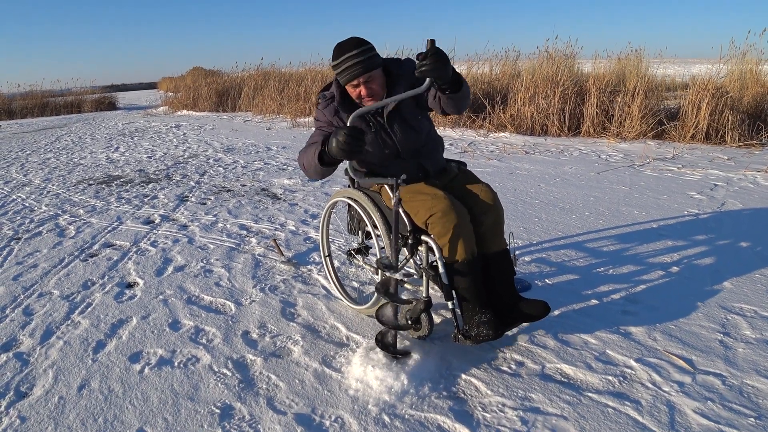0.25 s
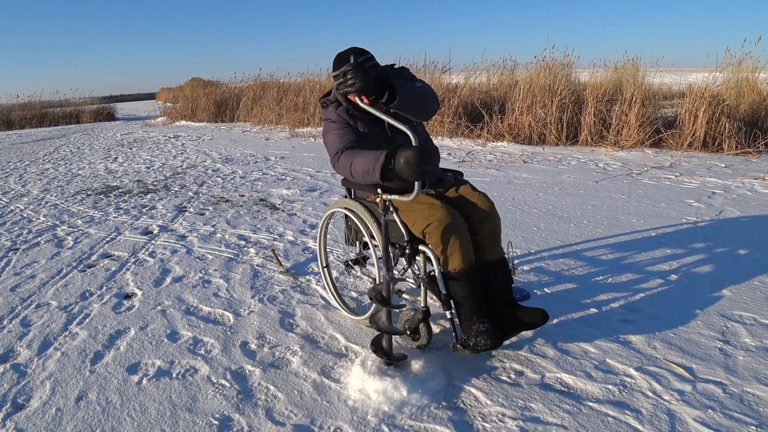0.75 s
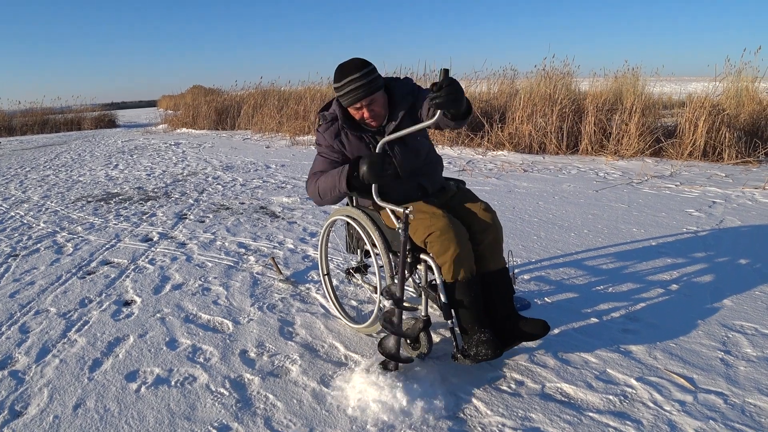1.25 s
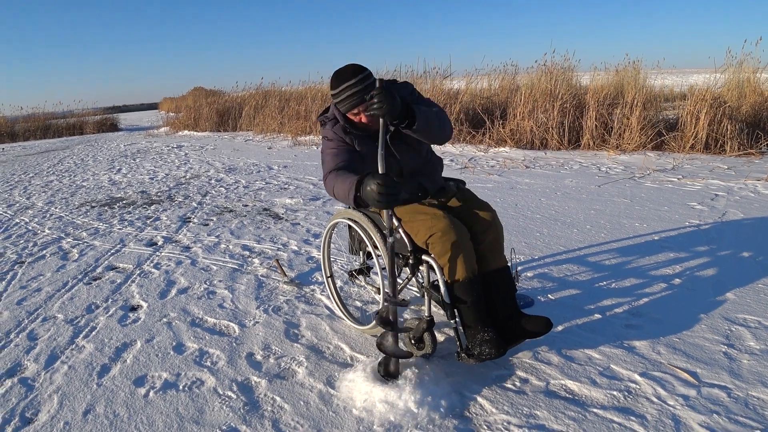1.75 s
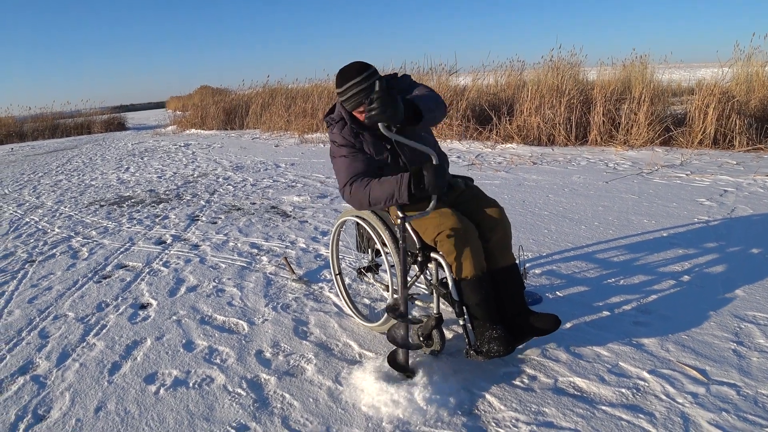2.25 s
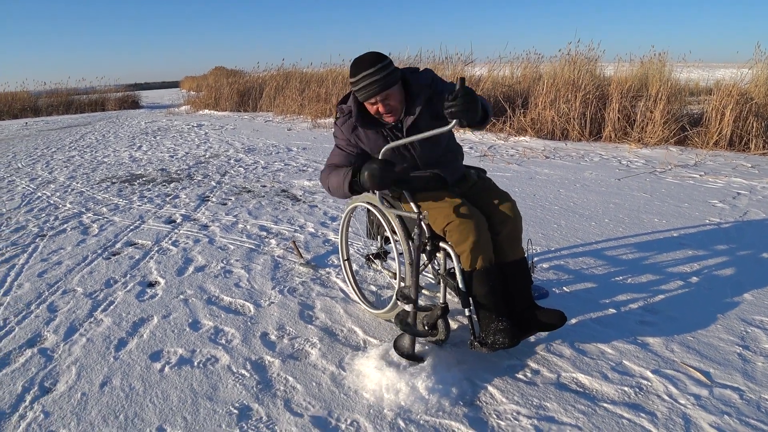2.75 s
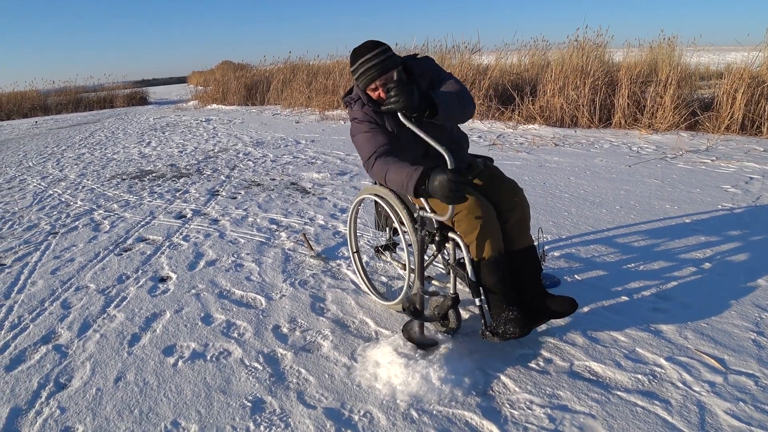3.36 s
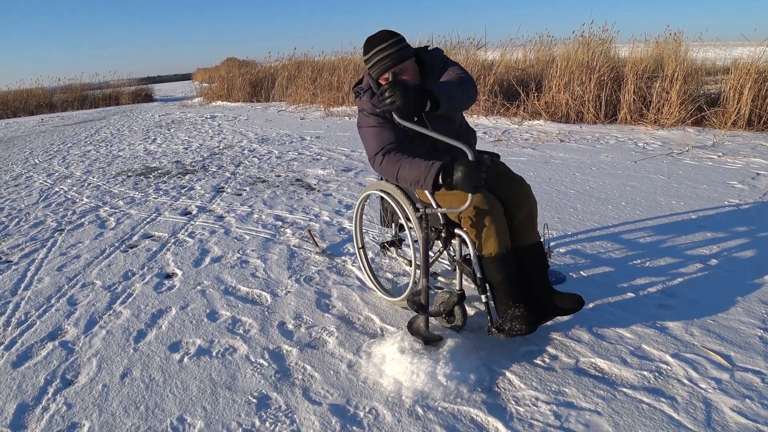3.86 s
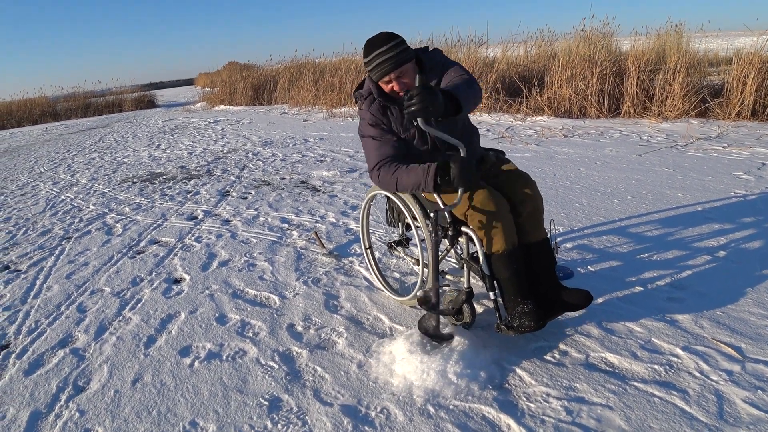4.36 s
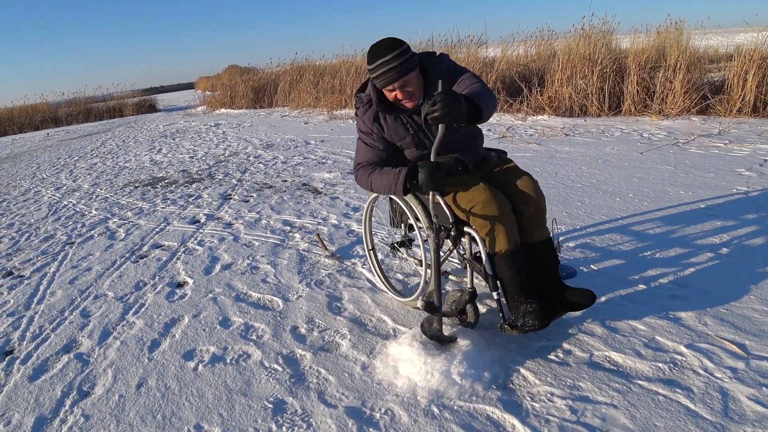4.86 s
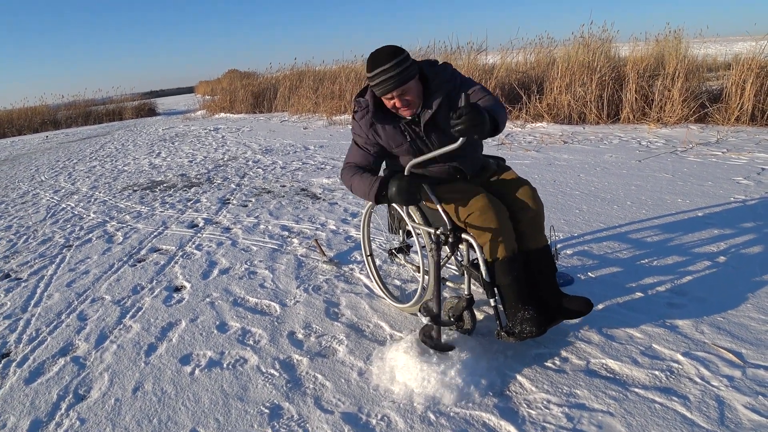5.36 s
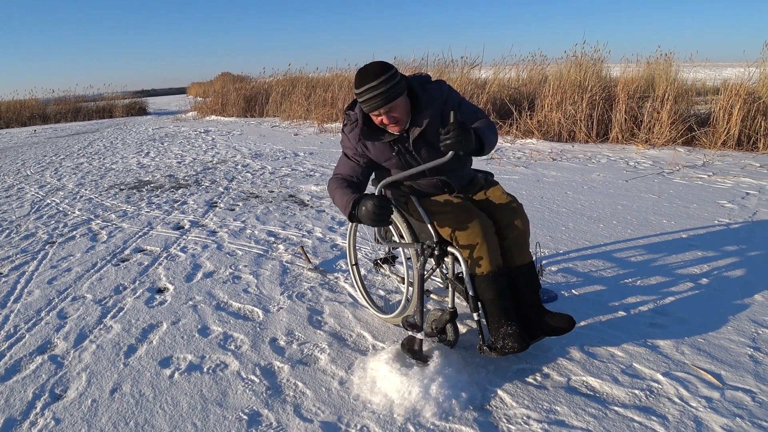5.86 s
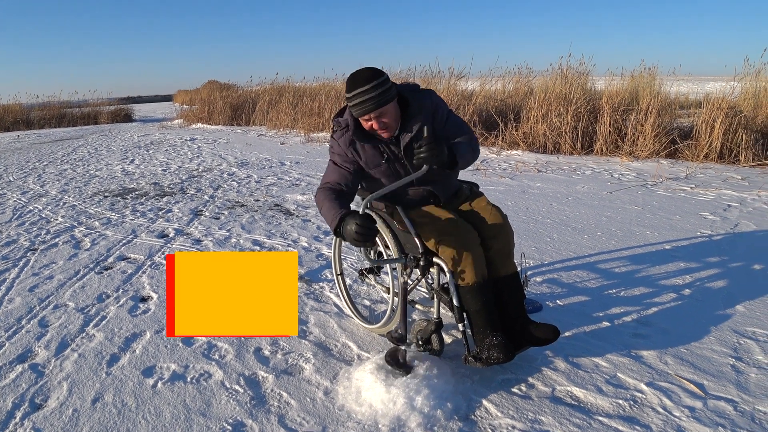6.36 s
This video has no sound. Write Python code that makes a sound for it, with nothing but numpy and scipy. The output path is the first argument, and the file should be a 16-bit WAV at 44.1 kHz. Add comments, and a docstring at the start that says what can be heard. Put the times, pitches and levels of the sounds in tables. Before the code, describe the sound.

A person turns a hand auger into thick ice, close to a stereo microphone in open air. Dense gritty scraping comes in uneven pushes, two or three a second, with crackling chips and brief snaps. After about a second and a half the blades sink and the tone turns hollow, wavering with every half turn. The drilling goes on to the end; the breeze is barely audible.

```python
"""Out on thick river ice, a camera's stereo microphone a few metres from a hand-cranked steel auger.
From the start each push on the crank breaks off dense, uneven chips that ring auger and hole: noise
driven by random chip forces, through resonances. Bigger flakes snap off now and then as noise bursts.
From 1.35 s the blades sink, the ringing changes and a hollow tone fades in, from 2 s swinging with each half turn.
A faint breeze puffs at the start, at 2.5, 4.47 and 6.04 s; a limiter holds down the sharpest peaks throughout."""
import sys
import numpy as np
from scipy import signal
from scipy.fft import rfft, irfft, next_fast_len
from scipy.io import wavfile
from scipy.ndimage import uniform_filter1d, minimum_filter1d, map_coordinates

SR = 44100
rng = np.random.default_rng(int(sys.argv[2]) if len(sys.argv) > 2 else 0)


def log_audio(samples):
    """Write samples as a 16-bit WAV file to the path given in sys.argv[1]."""
    # one column per channel
    frames = np.atleast_2d(samples).T
    # limit to full scale, then quantise
    limited = np.clip(frames, -1, 1)
    pcm = np.round(limited * 32767).astype(np.int16)
    wavfile.write(sys.argv[1], SR, pcm)


N = 291501

# how far the blades have sunk in: t/s, depth (0 surface, 1 sunk, 2 deep)
BLADE_DEPTH = [(1.35, 0), (1.95, .75), (2.3, .75), (4.1, 1.7), (4.9, 2)]
# pushes on the crank: t/s, length/s, then lift over the idle scrape: grinding/dB, crunch/dB, splinter/dB
PUSHES = [(-0.05, .29, 4, 4, 5), (0.249, 0.343, 3.5, 2.5, 4.5), (0.579, 0.55, 4.5, 5, 4.5),
          (1.106, 0.38, 4.5, 5.5, 5), (1.516, 0.17, 4.5, 3, 3.5), (1.672, 0.38, 3.5, 3.5, 3),
          (2.035, 0.39, 4, 2.5, 3), (2.399, .23, 5, 5.5, 6.5), (2.62, 0.38, 2.5, 4, 1),
          (2.995, 0.29, 3, 3, 1.5), (3.244, 0.25, 4, 0.5, 0), (3.458, 0.47, 3.5, 4, 1.5),
          (3.923, 0.38, 3.5, 5, 0.5), (4.31, .26, 4, 2, 4), (4.602, 0.56, 3.5, 3.5, 3),
          (5.223, .39, 1, 1, 1), (5.72, 0.2, 2.5, 6, 0), (5.944, .15, 4, 4.5, 5),
          (6.144, 0.48, 1.5, 3.5, 2)]
PUSH_ATTACK_S, PUSH_RELEASE_S = 0.034, 0.05
# scrape between pushes: grinding level/dB, crunch level/dB, splinter level/dB
IDLE_LEVELS = [-27, -29.5, -35.5]
UNEVEN_DB, UNEVEN_RATE_HZ = 0.23, 20  # uneven hardness of the ice: scale of the drift, knots a second
# the blades dig in for a moment: t/s, extra grinding/dB, extra crunch/dB, extra splinter/dB
BITES = [(0.37, 1.5, 6, -4), (0.51, 4.5, 3.5, 0), (0.63, 1.5, -4, 4), (0.88, 5, 2, 5), (1.035, -1, -2, 2),
         (1.2, 2.5, 0, 4), (1.56, 3.5, -1, 4), (2.135, 7, 9, 3), (2.33, 3, 11, 3), (2.47, 6, 1, 3.5),
         (2.58, 3, 1, -7), (2.83, 2, 3, -2), (2.93, 6.5, 1, -3), (3.03, 4.5, 0, 3), (3.28, -3, 2, 6.5),
         (3.36, 0, 8.5, 3), (3.61, 4, 5, 3), (3.72, 2, 1, 10), (4.245, 2, 5, 1), (4.69, 4.5, 6.5, -9),
         (4.82, 4, -5, 4), (5.57, 6, 4, 2), (6.03, 3, 4, -10), (6.41, 2, 1, 3)]
BITE_HALF_S = 0.023  # from the peak of a bite to 1/e of it
# the auger's low drone: t/s, level/dB
DRONE_LEVEL = [(0.05, -26.5), (0.33, -31.5), (0.72, -29.5), (1.4, -32), (1.82, -34.5), (2.35, -30),
               (2.65, -33.5), (3.25, -32.5), (3.85, -35), (4.75, -30.5), (5.3, -33.5), (6.6, -35)]
# half turns of the sunk auger: start t/s, peak level of the hollow ring/dB
HALF_TURNS = [(2.0, -26), (2.43, -28.5), (2.8, -29), (3.1, -27.5), (3.46, -26.5), (4.0, -28), (4.44, -26),
              (4.89, -25.5), (5.38, -26.5), (5.81, -25.5), (6.25, -25.5)]
LAST_HALF_TURN_S = 0.574
HOLLOW_HZ, HOLLOW_SAG_HZ = 1145, 39.82  # pitch at rest, its fall in mid swing
HOLLOW_DIP_DB = 9  # dip between swings
# flakes that snap off: t/s, burst level/dB, splinter level against the burst/dB
SNAPS = [(0.1327, -20, -11), (0.4208, -17, -26), (0.454, -24, -4), (1.026, -18, -3), (1.044, -18, -10),
         (1.3932, -12, -17), (1.8438, -12, -24), (2.118, -5, -16), (2.711, -13, -25), (2.812, -17, -14),
         (2.942, -11, -31), (3.5828, -17, -17), (3.7945, -8, -32), (4.182, -16, -7), (4.241, -12, -21),
         (4.683, -8, -26), (4.7984, -14, -9), (5.086, -13, -19), (5.159, -16, -25), (5.235, -16, -18),
         (5.5514, -23, 0), (5.5683, -27, 1), (6.02, -14, -30)]
# broad colours of the cut, before resonances: f/Hz, relative density level/dB
DRONE_COLOUR = [(30, -66), (80, -37), (150, -17), (240, -13), (325, -20), (380, -16), (430, -6), (620, 2.5),
                (720, -14), (900, -11.5), (1500, -46)]
GRIND_COLOUR = [(100, -85), (350, -36), (600, -11), (820, -6.5), (1300, -0.5), (2400, 0), (2800, -6),
                (3300, -9), (4500, -12.5), (9000, -66.5)]
CRUNCH_COLOUR = [(200, -72), (900, -65), (2500, -4.5), (3300, -7), (4800, -1.5), (6400, -2), (7000, -9.5),
                 (8000, -10), (10000, -17.5), (15000, -30)]
SPLINTER_COLOUR = [(300, -63), (3000, -39.5), (6500, -2), (8300, -1.5), (10600, -6), (12200, -14),
                   (15500, -16)]
# fine ice powder hissing along the blades: f/Hz, relative density level/dB
POWDER_COLOUR = [(2000, -40), (8000, -14), (11500, 2), (15500, 3)]
# resonances with the blades near the surface: f/Hz, width/Hz, lift/dB
SHALLOW_MODES = [(455.4, 100, 21), (780, 66, 6), (998, 120, 5.5), (1295, 100, 3.5), (1380, 110, 3.5),
                 (1940, 97, 5), (2370, 66, 5), (3750, 630, 6.5), (5960, 960, 4.5), (7260, 300, 5.5),
                 (10000, 500, 0.5), (14100, 600, 6)]
# resonances with the blades sunk in the hole: f/Hz, width/Hz, lift/dB
SUNK_MODES = [(473, 62, 8), (593, 36, 3.5), (828, 31, 8), (1000, 48, 4.5), (1298, 22, 5.5),
              (1570, 120, 2.5), (1930, 120, 3.5), (2290, 95, 5), (2460, 160, -0.5), (4830, 410, 1.5),
              (5860, 210, 3.5), (8580, 250, 1), (10600, 400, -0.5), (14200, 600, 2.5)]
# resonances with the blades deep in the hole: f/Hz, width/Hz, lift/dB
DEEP_MODES = [(243, 110, 3.5), (471, 43, 11), (603, 50, 2), (875, 150, 7.5), (1300, 50, 1), (1540, 58, 3.5),
              (1850, 200, 3.5), (2130, 110, 2.5), (2624, 91, 6.5), (2984, 96, 7.5), (4660, 380, 3.5),
              (5980, 310, 4), (8700, 280, 1), (14100, 600, 3)]
# stereo width: f/Hz, side level against the direct sound/dB
SIDE_LEVEL = [(40, -45), (110, -24), (380, -22), (470, -27), (700, -20), (950, -19.5), (1150, -24),
              (1800, -25), (2300, -20), (3100, -17.5), (4000, -20), (4650, -27), (5200, -21), (5900, -20),
              (6500, -31), (7400, -21), (8000, -20), (9200, -34), (11300, -21), (12500, -38)]
# typical lean of the auger's sound to the right: f/Hz, left minus right level/dB
RIGHT_LEAN = [(150, -.1), (350, -.2), (430, -1.4), (950, -1.5), (1400, -1), (1950, -.4), (2400, -1.8),
              (2900, -2.7), (3700, -1.5), (4500, -.2), (5900, -.7), (12000, 0)]
# how far the auger stands to the right: t/s, multiple of the typical lean
OFF_CENTRE = [(0, .7), (2.5, 1.1), (4.8, 1.4), (6.0, .9)]
# colour of the breeze: f/Hz, relative density level/dB
BREEZE_COLOUR = [(20, -16), (60, -21), (150, 6), (1000, -16), (10000, -38)]
BREEZE_DB = -85  # the calm between puffs
# puffs of wind: t/s, half length to 1/e/s, extra level/dB
PUFFS = [(0.0, .15, 19), (2.5, .14, 28), (4.47, 0.036, 13), (6.04, .04, 20)]
TOP_HZ = 15750  # the camera passes nothing from here up


def cutting(grind_db, crunch_db, splinter_db):
    """Steady shaving and breaking chips drive the auger, the bore and the ice."""
    chips = chipping(rate_hz=300, scatter_db=2.5, life_s=0.00056)
    slivers = chipping(rate_hz=240, scatter_db=13.5, life_s=0.00041)  # the smallest pieces, treble only
    judder = amp(0.58 * wobble(60))  # the blades catch and slip

    def force(shaving, fine=0):
        """Powers of chips, steady shaving and slivers add up, then judder."""
        return judder * np.sqrt(chips ** 2 + shaving ** 2 + (fine * slivers) ** 2)

    drone = in_bore(cracks(force(shaving=1.23), grain=0.41), DRONE_COLOUR)
    grind = in_bore(cracks(force(shaving=1.0), grain=0.64), GRIND_COLOUR)
    crunch = in_bore(cracks(force(shaving=0.85, fine=0.15), grain=0.65), CRUNCH_COLOUR)
    splinter = in_bore(cracks(force(shaving=2.44, fine=1.37), grain=0.49), SPLINTER_COLOUR)

    grind = patchy(grind, depth_db=2.7, width_hz=130, life_s=.04, size=1024)
    crunch = patchy(crunch, depth_db=3.3, width_hz=240, life_s=.022)
    splinter = patchy(splinter, depth_db=3, width_hz=330, life_s=.018)

    ringing = amp(curves(DRONE_LEVEL)[0]) * drone + hollow_ring(force(shaving=1.6))
    return ringing + amp(grind_db) * grind + amp(crunch_db) * crunch + amp(splinter_db) * splinter


def effort():
    """Levels in dB of grinding, crunch and splinters: pushes rise, hold and let go, and bites ride on them."""
    t = np.arange(N) / SR
    db = np.array(IDLE_LEVELS)[:, None] + UNEVEN_DB * wobble(UNEVEN_RATE_HZ)
    for start, length, *lift_db in PUSHES:
        rise = (t - start) / PUSH_ATTACK_S
        release = (start + length - t) / PUSH_RELEASE_S
        db += np.outer(lift_db, np.clip(np.minimum(rise, release), 0, 1))
    for s, *bite_db in BITES:
        db += np.outer(bite_db, bump(s, BITE_HALF_S))
    return db


def chipping(rate_hz, scatter_db, life_s, count=12000):
    """Force of chips breaking at random moments: each swells and dies within milliseconds."""
    gaps = rng.exponential(size=count)
    sizes = np.minimum(rng.standard_normal(count), 2.2)  # no giant chips
    at = (np.cumsum(gaps) * SR / rate_hz).astype(int)
    heard = at < N
    power = np.bincount(at[heard], amp(scatter_db * sizes[heard]) ** 2, N)
    u = np.arange(SR // 20) / SR / life_s
    swelling = signal.oaconvolve(power, u ** 2 * np.exp(-u))[:N]
    return unit(np.sqrt(np.abs(swelling)))


def cracks(force, grain):
    """Tiny cracks of uneven size that make up the breaking of the ice."""
    uneven = np.exp(grain * rng.standard_normal(N))
    return unit(force * rng.standard_normal(N) * uneven)


def in_bore(x, colour):
    """The resonances change as the blades sink into the ice: neighbouring stages crossfade."""
    depth = np.clip(curves(BLADE_DEPTH)[0], 0, 2)
    total = 0
    for stage, modes in enumerate([SHALLOW_MODES, SUNK_MODES, DEEP_MODES]):
        share = np.maximum(0, 1 - np.abs(depth - stage))
        total = total + share * rung(x, colour, modes)
    return unit(total)


def patchy(x, depth_db, width_hz, life_s, size=512):
    """Each piece of ice has pitches of its own: the energy shifts between patches of the spectrum."""
    hz, t, z = signal.stft(x, SR, nperseg=size, noverlap=size // 2)
    knots = rng.standard_normal((256, 1024))
    places = np.meshgrid(hz / width_hz, t / life_s, indexing="ij")
    field = map_coordinates(knots, places, order=1, mode="wrap")
    gain = amp(depth_db * unit(field))
    # the colour changes, the strength of the cut does not
    share = np.mean(np.abs(z) ** 2, axis=1)
    gain /= np.sqrt(share @ gain ** 2 / share.sum())
    return unit(signal.istft(z * gain, SR, nperseg=size, noverlap=size // 2)[1][:N])


def hollow_ring(force, width_hz=135, order=2):
    """One hollow resonance swells and sags in pitch with every half turn of the sunk blades."""
    t = np.arange(N) / SR
    starts, peak_db = np.transpose(HALF_TURNS)
    ends = np.append(starts, starts[-1] + LAST_HALF_TURN_S)
    turned = np.interp(t, ends, np.arange(len(starts) + 1))  # half turns so far
    swing = np.abs(np.sin(np.pi * turned))
    current = np.minimum(turned.astype(int), len(starts) - 1)
    db = peak_db[current] - HOLLOW_DIP_DB * (1 - swing)
    pitch_hz = HOLLOW_HZ - HOLLOW_SAG_HZ * swing ** 4
    # low-passed complex noise, shifted up to the moving pitch
    kicks = force * (rng.standard_normal(N) + 1j * rng.standard_normal(N))
    swell = signal.sosfilt(signal.butter(order, width_hz / 2, fs=SR, output="sos"), kicks)
    ring = np.real(swell * np.exp(2j * np.pi * np.cumsum(pitch_hz) / SR))
    sunk = np.clip(curves(BLADE_DEPTH)[0], 0, 1)
    return sunk * amp(db) * unit(ring)


def snaps(life_s=0.0017, crumble_db=-15, crumble_life_s=.004):
    """A flake tears loose in a short burst, then crumbles."""
    t = np.arange(SR // 20) / SR
    burst = t / life_s * np.exp(1 - t / life_s) + amp(crumble_db) * np.exp(-t / crumble_life_s)
    body, bright = np.zeros((2, N + SR))
    for s, db, splinter_db in SNAPS:
        start = round(s * SR)
        body[start:][:len(t)] += amp(db) * burst
        bright[start:][:len(t)] += amp(db + splinter_db) * burst
    noise = rng.standard_normal((3, N))
    knock = amp(-10.5) * rung(noise[0] * body[:N], GRIND_COLOUR, SUNK_MODES)
    crack = amp(-4.5) * rung(noise[1] * body[:N], CRUNCH_COLOUR, SUNK_MODES)
    tick = amp(4.5) * rung(noise[2] * bright[:N], SPLINTER_COLOUR, SUNK_MODES)
    return knock + crack + tick


def powder(splinter_db, level_db=-51, follow=.3):
    """The finest powder hisses evenly and follows the cut only a little."""
    hiss = unit(rung(rng.standard_normal(N), POWDER_COLOUR))
    return amp(level_db + follow * (splinter_db - splinter_db.mean())) * hiss


def outdoors(x, size=1024):
    """The auger stands slightly to the right; a faint random-phase side signal widens the sound."""
    z = signal.stft(x, nperseg=size)[2]
    random_phase = np.exp(2j * np.pi * rng.random(z.shape))
    diffuse = signal.istft(z * random_phase, nperseg=size)[1][:N]
    side = filtered(np.std(x) * unit(diffuse), lambda hz: amp(along(SIDE_LEVEL, hz)))
    leaning = filtered(x, lambda hz: amp(np.outer([.5, -.5], along(RIGHT_LEAN, hz))))
    return x + curves(OFF_CENTRE)[0] * (leaning - x) + np.array([side, -side])


def air(flutter_db=4.5):
    """A faint breeze, equal in both channels, flutters and comes in small puffs."""
    db = BREEZE_DB + flutter_db * wobble(11)
    for s, half_s, puff_db in PUFFS:
        db += puff_db * bump(s, half_s)
    return amp(db) * unit(rung(rng.standard_normal(N), BREEZE_COLOUR))


def rung(x, colour, modes=(), size=4096):
    """x through a causal body: a broad colour with resonances on top, as a minimum-phase filter."""
    hz = np.fft.rfftfreq(size, 1 / SR)
    db = along(colour, hz)
    for f, width, lift in modes:
        db = db + lift / (1 + (2 * (hz - f) / width) ** 2)
    # folding the cepstrum makes the answer start at once
    cepstrum = irfft(np.log(amp(db)))
    cepstrum[1:size // 2] *= 2
    cepstrum[size // 2 + 1:] = 0
    answer = irfft(np.exp(rfft(cepstrum)))
    return signal.oaconvolve(x, answer / np.linalg.norm(answer))[:N]


def filtered(x, response):
    """x times a response of frequency, zero-padded against wrap-around."""
    m = 2 * next_fast_len(N // 2 + SR // 8)
    return irfft(rfft(x, m) * response(np.fft.rfftfreq(m, 1 / SR)), m)[..., :N]


def wobble(rate_hz):
    """A smooth random curve, rate_hz knots a second."""
    return map_coordinates(rng.standard_normal(4000), [np.arange(N) * rate_hz / SR], mode="wrap")


def bump(s, half_s):
    """A smooth rise to 1 at time s, and its fall."""
    return np.exp(-np.minimum(((np.arange(N) / SR - s) / half_s) ** 2, 20))


def curves(rows):
    """One value per sample for each column after the time."""
    s, *cols = np.transpose(rows)
    return [np.interp(np.arange(N) / SR, s, c) for c in cols]


def along(points, hz):
    """Values over f/Hz read on a log axis."""
    f, v = np.transpose(points)
    return np.interp(np.log(hz + 1), np.log(f + 1), v)


def amp(db):
    """Decibels to gain."""
    return 10 ** (np.asarray(db) / 20)


def unit(x):
    """Scaled to rms 1."""
    return x / np.sqrt(np.mean(x ** 2) + 1e-20)


def scene():
    """The auger on the open ice, with the breeze behind it."""
    grind_db, crunch_db, splinter_db = effort()
    auger = cutting(grind_db, crunch_db, splinter_db) + snaps() + powder(splinter_db)
    return outdoors(auger) + air()


def record(dry, ceiling_db=-10.0, size=45):
    """A fast limiter, one gain for both channels over size samples, then the camera's band limit."""
    peak = np.abs(dry).max(axis=0)
    needed = np.minimum(1, amp(ceiling_db) / (peak + 1e-9))
    gain = uniform_filter1d(minimum_filter1d(needed, size), size)
    return filtered(dry * gain, lambda hz: hz < TOP_HZ)


dry = scene()
out = record(dry)
log_audio(out)
```